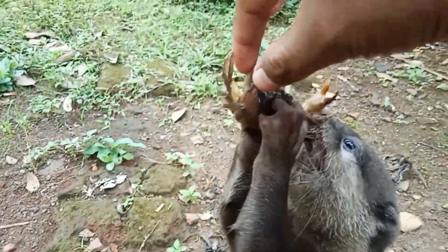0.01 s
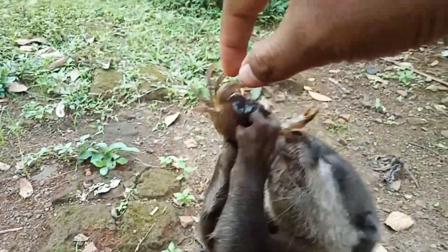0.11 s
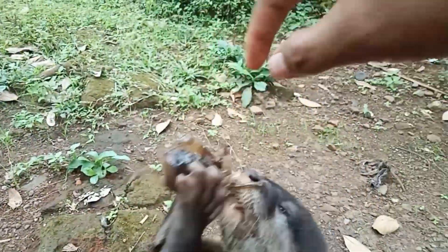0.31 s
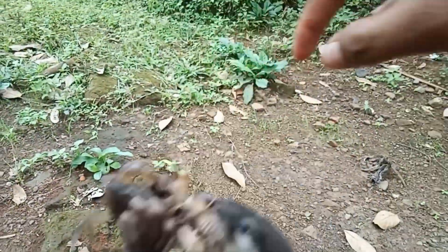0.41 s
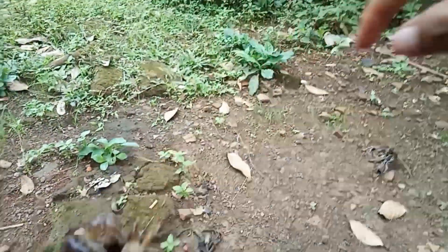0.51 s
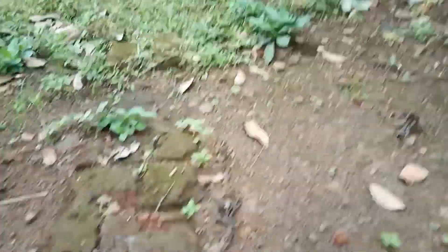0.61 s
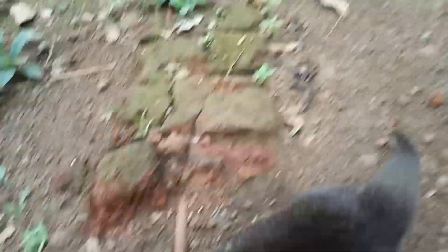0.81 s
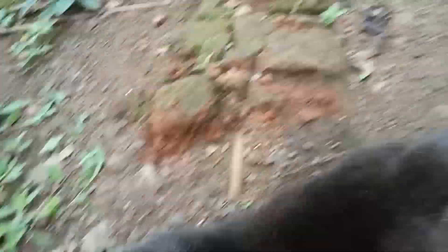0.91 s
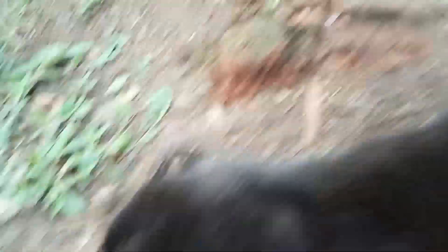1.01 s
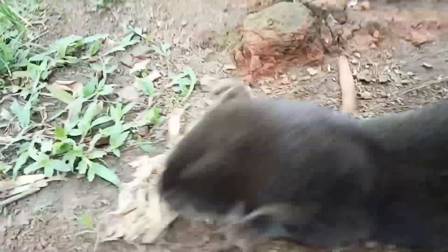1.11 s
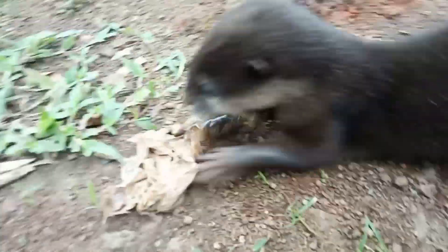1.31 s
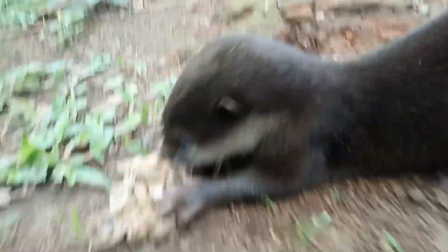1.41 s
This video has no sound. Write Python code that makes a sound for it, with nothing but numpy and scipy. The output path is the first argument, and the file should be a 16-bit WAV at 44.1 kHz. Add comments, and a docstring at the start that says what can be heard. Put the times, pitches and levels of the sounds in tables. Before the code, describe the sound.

A small otter close to the microphone whistles high, swoops down and up, then cracks into a loud rasp and falling squeal; afterward paws scuff grit and pebbles click over soft outdoor rumble and hiss.

```python
"""Outdoors, on gritty ground: a small otter close by gives one long swooping whistle that breaks into
a rasp and ends in a lower, falling squeal; then paws scuff and pebbles click. Behind are rumble and
hiss, a bass throb of uneven strength and a thin tone. The voices are sums of harmonics weighted by the
throat; breath, scuffs and outdoors are filtered noise or grains, the throb decaying puffs, the tone a sine."""
import sys
import numpy as np
from scipy import signal
from scipy.fft import rfft, irfft
from scipy.io import wavfile
from scipy.ndimage import uniform_filter1d

SR = 44100
rng = np.random.default_rng(int(sys.argv[2]) if len(sys.argv) > 2 else 0)


def to_wav(sig):
    """Store sig (one row per channel, or 1-D mono) as 16-bit WAV at the path in sys.argv[1].

    Samples outside -1..1 are clipped; the rate is SR.
    """
    pcm = np.clip(np.atleast_2d(sig), -1, 1) * 32767
    pcm = np.round(pcm).astype(np.int16)
    wavfile.write(sys.argv[1], SR, pcm.T)  # frames by channels


def voltage_ratio(decibels):
    """Convert decibels (scalar or array-like) to amplitude ratios, 20 dB per decade."""
    exponent = np.asarray(decibels, float) / 20
    return 10 ** exponent


N = 66150   # 1.5 s
WOBBLE_HZ = 139   # how fast the whistled and voiced pitches waver

# resonances of throat and mouth: (frequency [Hz], relative level [dB])
THROAT = [(1000, -47), (1600, -26), (2600, 10), (3400, -8), (4200, -12.5), (5000, -23.5), (6300, -9.5),
          (7500, -22.5), (8500, -22), (16000, -44.5)]
# colour of grit and pebbles: (frequency [Hz], relative level [dB])
GRIT = [(1180, -45), (2000, -12), (2700, -1), (3450, 5), (4500, -19), (6200, -21), (8000, -40),
        (15600, -53)]


def rms_one(x):
    """Normalise to unit root mean square."""
    return x / np.sqrt(np.mean(x ** 2) + 1e-20)


def in_time(rows):
    """Linear interpolation turns each column of a table into a curve over time."""
    s, *columns = np.transpose(rows)
    return [np.interp(np.arange(N) / SR, s, c) for c in columns]


def at_hz(points, hz):
    """Interpolate a spectrum on a logarithmic frequency axis."""
    table_hz, table_db = np.array(points).T
    return np.interp(np.log(hz), np.log(table_hz), table_db)


def drift(rate_hz):
    """Low-passed white noise makes a slow random fluctuation of zero mean and unit spread."""
    r = np.exp(-2 * np.pi * rate_hz / SR)
    x = signal.lfilter([1], [1, -2 * r, r * r], rng.standard_normal(2 * N))[N:]   # settled half
    return rms_one(x - x.mean())


def coloured(x, spectrum, tilt_db=0):
    """Zero-phase spectral shaping, with a tilt in dB per octave about 1 kHz; unit rms."""
    hz = np.arange(N // 2 + 1) * SR / N + 1   # 1 Hz up, to avoid log 0
    gain_db = at_hz(spectrum, hz) + tilt_db * np.log2(hz / 1000)
    return rms_one(irfft(rfft(x) * voltage_ratio(gain_db), N))


def narrow(hz, width_hz):
    """Band-pass filtering of white noise leaves one narrow band; unit rms."""
    edges = [hz - width_hz / 2, hz + width_hz / 2]
    band = signal.butter(2, edges, "band", fs=SR, output="sos")
    return rms_one(signal.sosfilt(band, rng.standard_normal(2 * N))[N:])


def voice(rows, tilt, mouth, broken, third_db, main, count):
    """Source-filter principle: harmonics of a wavering pitch, weighted by resonances and a source tilt.

    The level column holds at main times the pitch, where the weight is 0 dB."""
    jitter, break_jitter, tear_hz = 0.003, 0.037, 470   # pitch shares; speed of the tearing
    hz, level_db = in_time(rows)
    slope_db, = in_time(tilt)
    waver = jitter * drift(WOBBLE_HZ) + break_jitter * broken * drift(tear_hz)
    hz = uniform_filter1d(hz, size=100) * (1 + waver)
    phase = 2 * np.pi * np.cumsum(hz) / SR
    t = np.arange(N) / SR
    harmonics = np.zeros(N)
    for k in range(1, count + 1):
        resonance_db = at_hz(mouth, k * hz) - at_hz(mouth, main * hz)
        weight_db = resonance_db + third_db * (k == 3) + slope_db * np.log2(k / main)
        audible = k * hz < SR / 2
        harmonics += voltage_ratio(weight_db) * audible * np.sin(k * phase + k * k)
    inside = 1. * (t >= rows[0][0]) * (t < rows[-1][0])   # only within the table's span
    gate = uniform_filter1d(inside, size=100)
    return np.sqrt(2) * voltage_ratio(level_db) * gate * harmonics


def otter():
    """Superposition of voices and breath; amplitude modulation roughens the break, the ground reflects."""
    # how far the whistle breaks up: (time [s], share [0-1])
    break_up = [(.575, 0), (.588, .4), (.597, .1), (.607, .25), (.614, 1), (.634, .8), (.64, 0)]
    # reflections from the ground: (delay [s], level [dB])
    echoes = [(.004, -16.5)]
    pulse_hz, pulse_depth, pulse_uneven = 600, .45, .4   # mean rate, depth, spread of the rate
    broken = np.clip(in_time(break_up)[0], 0, 1)
    turns = np.cumsum(pulse_hz * (1 + pulse_uneven * drift(54.6))) / SR
    pulses = 1 - pulse_depth * broken * (.5 + .5 * np.cos(2 * np.pi * turns))
    direct = pulses * (whistle(broken) + throat_air()) + side_whistle() + squeal(broken)
    return direct + sum(voltage_ratio(db) * np.roll(direct, int(s * SR)) for s, db in echoes)


def whistle(broken):
    """A gliding harmonic series: the high swooping whistle, torn in pitch where it breaks."""
    # before the break's pulses: (time [s], pitch [Hz], level of the fundamental [dB])
    pitch_level = [(0.0, 6540.0, -22.5), (0.044, 6760.0, -29.5), (0.066, 7500.0, -33),
                   (0.08, 7700.0, -30.5), (0.09, 7552.0, -31.5), (0.104, 6500.0, -27.5),
                   (0.117, 5910.0, -30.5), (0.129, 4993.0, -52), (0.144, 4365.0, -45), (0.153, 4130, -29.5),
                   (.167, 3970, -27), (0.186, 3571.0, -24), (0.196, 3250.0, -24.5), (0.206, 2880, -17),
                   (0.216, 2738, -19.5), (0.249, 2686.0, -14.5), (0.258, 2788.0, -20),
                   (0.279, 3429.0, -24.5), (0.288, 3434.0, -19), (0.3, 3122.0, -25.5),
                   (0.309, 3305.0, -28.5), (0.321, 3240.0, -24), (0.339, 3827.0, -23.5),
                   (0.351, 4021.0, -23), (0.384, 3631.0, -23.5), (0.408, 3989.0, -28),
                   (0.417, 4260.0, -41.5), (0.432, 4150.0, -40), (0.435, 4548.0, -39.5),
                   (0.447, 4900.0, -43), (0.45, 4700.0, -49), (.456, 4880, -45), (.459, 5120, -35),
                   (.462, 4980, -41), (0.467, 5200.0, -41), (.471, 5020, -44), (0.484, 4960.0, -43),
                   (0.4875, 5270.0, -44), (.492, 5060, -41), (0.5, 5200.0, -38), (0.507, 5507.0, -51),
                   (0.511, 5811.0, -36), (0.517, 5781.0, -46), (0.522, 6037.0, -29), (0.534, 6042.0, -29),
                   (0.543, 5816.0, -28.5), (0.549, 5275.0, -49.5), (0.561, 4858.0, -40.5),
                   (0.575, 3950.0, -19.5), (0.59, 3150.0, -13.5), (.592, 3000, -19.5), (0.594, 2900.0, -7),
                   (0.598, 2800.0, -5), (.604, 2550, -8.5), (0.606, 2460.0, -12), (.61, 2350, -14),
                   (0.614, 2287.0, -6.5), (0.618, 2212.0, -24), (0.622, 2438.0, -28), (0.625, 2341.0, -8),
                   (0.628, 2395.0, -17.5), (0.633, 2350.0, -3), (0.636, 2239.0, -19)]
    # fall of the overtones at the larynx: (time [s], slope [dB per octave])
    tilt = [(0, -8), (.1, -7.5), (0.148, -4), (.22, -16), (.4, -6.5), (.5, 2), (.561, 6), (0.571, 1),
            (0.578, -35), (0.586, -29), (.593, -6)]
    return voice(pitch_level, tilt, THROAT, broken, third_db=-3.5, main=1, count=5)


def throat_air():
    """Turbulence noise: air rushing through the throat takes on its resonances."""
    # before flicker and pulses: (time [s], level [dB])
    air = [(0, -55), (.1, -68), (.13, -51), (.2, -68), (.42, -78.5), (.44, -45), (.52, -57.5), (.555, -45),
           (.575, -28.5), (.6, -25), (.62, -23), (.632, -25.5), (.642, -34), (.69, -62)]
    flicker_db, flicker_hz = 3.5, 64
    tilt_db_per_octave = 4
    noise = coloured(rng.standard_normal(N), THROAT, tilt_db_per_octave)
    return voltage_ratio(in_time(air)[0] + flicker_db * drift(flicker_hz)) * noise


def outdoors():
    """Broadband noise split by a crossover: distant rumble and leaf hiss, each gently patchy."""
    # colour of the outdoors: (frequency [Hz], relative spectrum level [dB])
    spectrum = [(25, -51), (59, -10.5), (119, -6.5), (233, -1), (274, -5.5), (433, -8.5), (1300, -21),
                (1900, -13.5), (3820, -14), (4870, -32.5), (6210, -38), (8570, -49.5), (15500, -48)]
    # rumble before patchiness: (time [s], level [dB])
    rumble_level = [(0, -45.5), (.3, -42), (.93, -49.5), (1.3, -43), (1.5, -48)]
    # hiss before patchiness: (time [s], level [dB])
    hiss_level = [(0, -46), (.3, -41.5), (.55, -43.5), (.8, -46.5), (1.05, -48), (1.22, -50), (1.5, -47.5)]
    patchy_db, split_hz = 1.73, 630
    noise = coloured(rng.standard_normal(N), spectrum)
    rumble = signal.sosfiltfilt(signal.butter(2, split_hz, fs=SR, output="sos"), noise)
    hiss = noise - rumble
    rumble_gain = voltage_ratio(in_time(rumble_level)[0] + patchy_db * drift(3.3))
    hiss_gain = voltage_ratio(in_time(hiss_level)[0] + patchy_db * drift(3.7))
    return rumble_gain * rms_one(rumble) + hiss_gain * rms_one(hiss)


def throb():
    """Periodic excitation with exponential decay: soft regular bass puffs, like a far engine idling."""
    # uneven strength of the puffs, some strong and some faint: (time [s], level [dB])
    level = [(.1, -53.5), (.3, -39.5), (.42, -60), (.53, -44.5), (.64, -70), (.75, -47), (.95, -58),
             (1.5, -53.5)]
    puffs_per_s, offset_s = 9.54, .092
    centre_hz, width_hz = 92, 55
    decay_s, attack_s = 0.028, 0.0045
    since = (np.arange(N) / SR - offset_s) % (1 / puffs_per_s)   # time since the last puff
    beat = (1 - np.exp(-since / attack_s)) * np.exp(-since / decay_s)
    thud = np.sin(2 * np.pi * centre_hz * since) + 1.1 * narrow(centre_hz, width_hz)
    return voltage_ratio(in_time(level)[0]) * rms_one(beat * thud)


def tone():
    """Amplitude modulation of a pure tone: thin and far, steady in pitch, chopped unevenly."""
    # before the chopping: (time [s], level of half the peak amplitude [dB])
    level = [(0, -59.5), (.3, -48), (.45, -52), (.8, -65), (1.0, -56), (1.1, -54), (1.35, -62), (1.5, -96)]
    tone_hz, chop_hz, chop_db = 1881, 40, 6
    sine = np.sin(2 * np.pi * tone_hz * np.arange(N) / SR)
    chop = chop_db * np.minimum(drift(chop_hz), .7)   # dips run deeper than rises
    return voltage_ratio(in_time(level)[0] + chop) * 2 * sine


def side_whistle():
    """Frequency modulation of a sine: a faint second whistle of the air in the throat."""
    # the wavering line: (time [s], mean frequency [Hz], peak level [dB])
    line = [(.435, 6350, -62), (.47, 6350, -56), (.499, 7000, -48), (.503, 7000, -68)]
    hz, level_db = in_time(line)
    t = np.arange(N) / SR
    gate = (t > line[0][0]) * (t < line[-1][0])
    phase = 2 * np.pi * np.cumsum(hz * (1 + 0.017 * drift(WOBBLE_HZ))) / SR
    return gate * voltage_ratio(level_db) * np.sin(phase)


def squeal(broken):
    """A lower harmonic series through a wider mouth, croaking in during the break and falling."""
    # the squeal: (time [s], pitch [Hz], level near the second harmonic [dB])
    pitch_level = [(.613, 1577, -61), (.619, 1554, -19.5), (.63, 1566, -33), (.637, 1493, -12.5),
                   (.648, 1376, -9.5), (.661, 1327, -9), (.668, 1259, -21.5), (.679, 1213, -14),
                   (.688, 1156, -20), (.709, 1096, -21.5), (.717, 1134, -19.5), (.72, 1255, -31.5),
                   (.728, 1210, -28.5), (.732, 1200, -80)]
    # fall of the overtones at the larynx: (time [s], slope [dB per octave])
    tilt = [(0.623, -6), (0.636, -7), (0.703, -11), (.73, -20)]
    # resonances of the wider mouth: (frequency [Hz], relative level [dB])
    open_mouth = [(1000, -39), (1600, -30), (2300, 0.5), (2800, -0.5), (3500, -10), (4200, -27.5),
                  (5000, -42), (6300, -10.5), (7500, -52), (9000, -24.5), (11000, -29.5), (12500, -37),
                  (16000, -44)]
    return voice(pitch_level, tilt, open_mouth, broken, third_db=0, main=2.087, count=12)


def scuffs():
    """Granular friction: random impacts of grit crackle under each short stroke of a paw."""
    # paw strokes: (start [s], length [s], level at the middle [dB])
    strokes = [(0.964, 0.045, -47), (1.046, 0.023, -46.5), (1.102, 0.048, -38.5)]
    grains_per_s, spread_db = 990, -4   # mean rate; mean drop of a grain before the cap at four times it
    struck = rng.random(N) < grains_per_s / SR
    strength = voltage_ratio(spread_db * np.minimum(rng.exponential(1, N), 4))
    grains = struck * strength * rng.choice([-1, 1], N)
    t = np.arange(N) / SR
    envelope = np.zeros(N)
    for s, length, db in strokes:
        arch = np.sqrt(np.abs(np.sin(np.pi * np.clip((t - s) / length, 0, 1))))
        envelope += voltage_ratio(db) * arch * (t < s + length)
    return envelope * coloured(grains, GRIT)


def cracks():
    """Impulse response: single pebbles click with the colour of the grit."""
    # the clicks: (time [s], peak level [dB])
    pebbles = [(.966, -28), (.971, -31.5), (.989, -48), (1.0517, -40), (1.0986, -29), (1.109, -25.5),
               (1.117, -31), (1.12, -30), (1.128, -23), (1.139, -25.5)]
    clicks = np.zeros(N)
    for s, db in pebbles:
        clicks[int(s * SR)] = voltage_ratio(db)
    out = coloured(clicks, GRIT)
    return out * clicks.max() / np.abs(out).max()   # restores the highest peak


def scene():
    """Linear superposition of all sources in one channel."""
    return (otter() + outdoors() + throb() + tone() + scuffs() + cracks())[None]


def top_cut(x):
    """Nothing passes above the cut-off."""
    return signal.sosfilt(signal.butter(12, 15640, fs=SR, output="sos"), x)


def record(dry):
    """High-pass response of the microphone, then soft saturation that rounds the peaks."""
    low_hz, ceiling = 45, .95   # corner of the bass loss; full scale is 1
    x = signal.sosfilt(signal.butter(2, low_hz, "high", fs=SR, output="sos"), dry)
    x = x / (1 + np.abs(x / ceiling) ** 6) ** (1 / 6)
    return top_cut(x)


dry = scene()
out = record(dry)
to_wav(out)
```